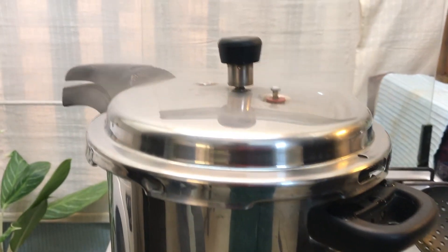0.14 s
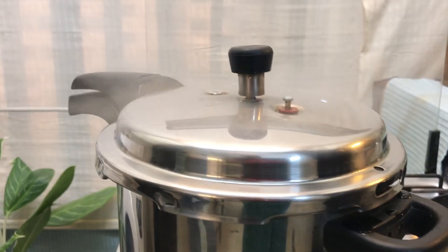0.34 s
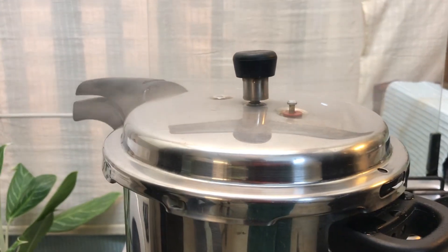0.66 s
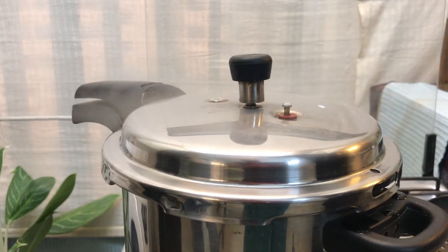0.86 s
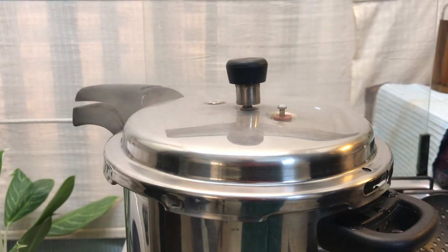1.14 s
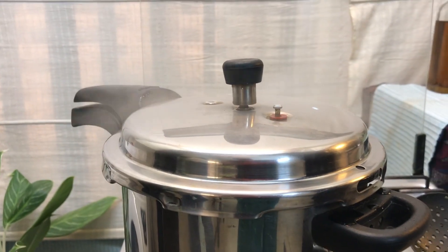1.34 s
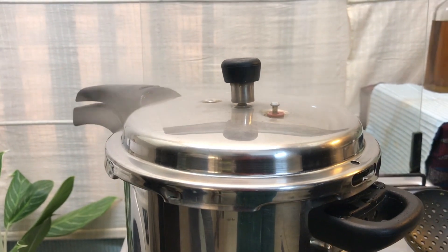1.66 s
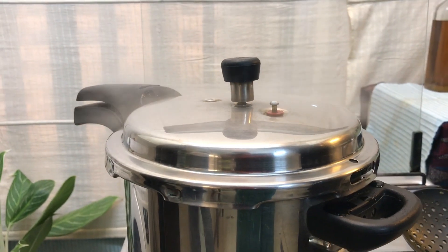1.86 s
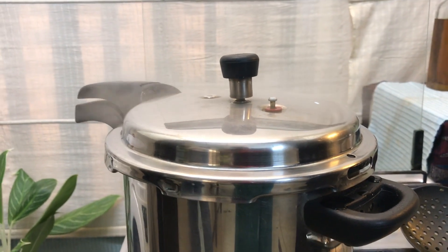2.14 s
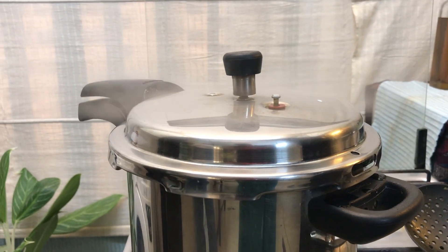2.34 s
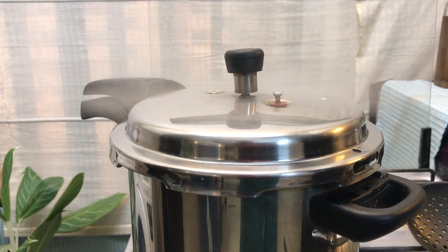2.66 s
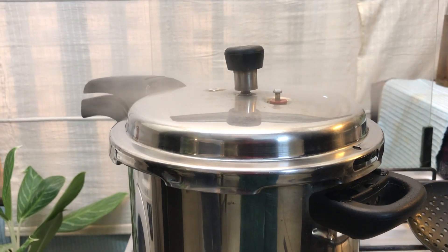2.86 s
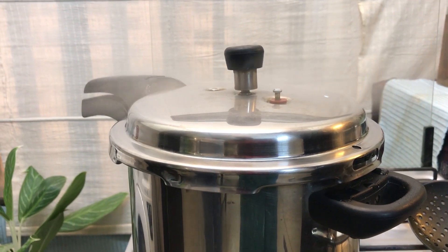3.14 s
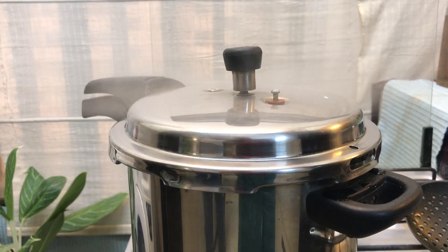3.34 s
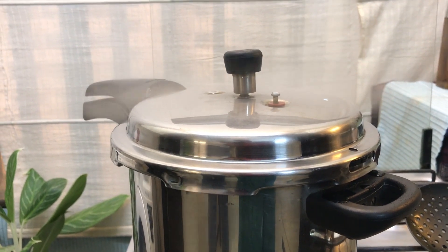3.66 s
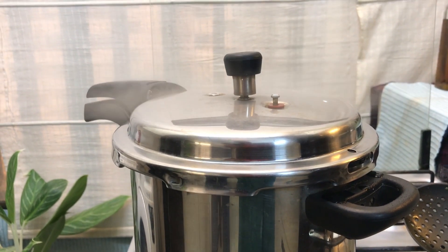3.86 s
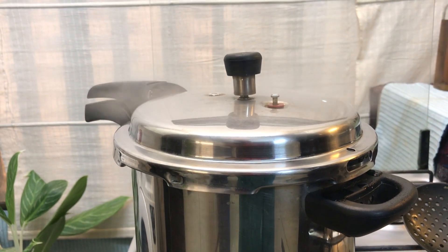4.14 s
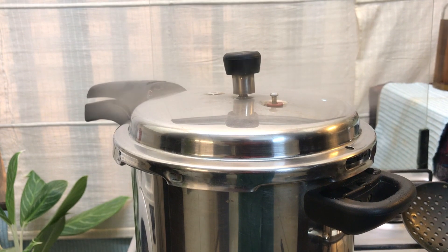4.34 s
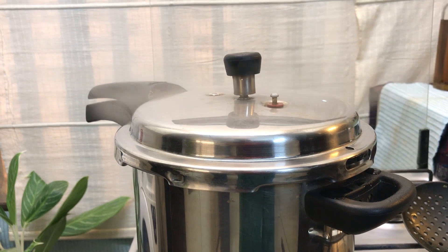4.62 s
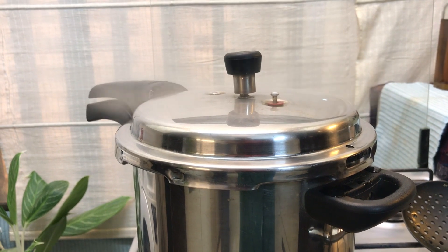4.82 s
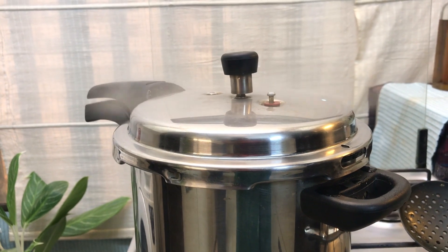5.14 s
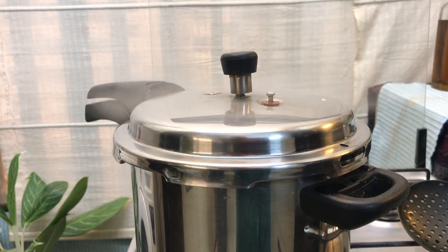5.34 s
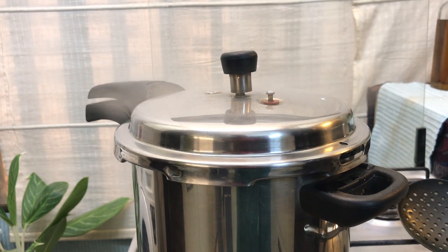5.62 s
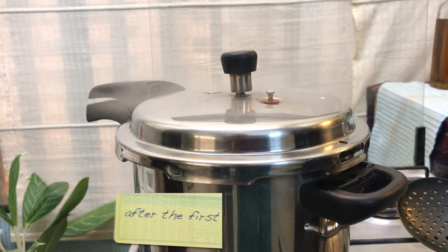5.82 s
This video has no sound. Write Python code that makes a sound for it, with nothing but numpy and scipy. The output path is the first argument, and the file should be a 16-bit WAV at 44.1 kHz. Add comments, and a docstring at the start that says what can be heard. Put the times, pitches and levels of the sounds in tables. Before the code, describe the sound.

Steam rushes continuously from under a pressure cooker's valve, a sharp, slightly wavering hiss with a faint airy whistle inside it.

```python
"""A bright, turbulent hiss: a steel pressure cooker vents on a kitchen stove, close by.
Steam rushes out under the lifted, bobbing weight valve, coloured by valve, lid and pot,
and blows a faint breathy whistle in the vent. Lid and nearby walls throw the hiss back.
Room rumble, mains hum and a few soft low tones lie far below."""
import sys
import numpy as np
from scipy import signal
from scipy.fft import rfft, irfft
from scipy.io import wavfile

SR = 44100
rng = np.random.default_rng(int(sys.argv[2]) if len(sys.argv) > 2 else 0)


def unload_audio(sound):
    """Save the sound as a 16-bit wav file, at the path given as the first command line argument."""
    columns = np.transpose(np.atleast_2d(sound))
    # keep every value between -1 and 1, then stretch to whole-number steps
    steps = np.round(np.clip(columns, -1, 1) * 32767)
    wavfile.write(sys.argv[1], SR, steps.astype(np.int16))


N = 264159
TIME = np.arange(N) / SR
FREQS_HZ = np.maximum(np.arange(N // 2 + 1) * SR / N, 1)


def from_db(db):
    """Decibels to gain."""
    return 10 ** (np.asarray(db) / 20)


def unit_rms(x):
    """Scale to rms 1."""
    return x / np.sqrt(np.mean(x ** 2) + 1e-20)


def drift(rate_hz):
    """Random wander, rms 1, rolling off above rate_hz."""
    return unit_rms(irfft(rfft(rng.standard_normal(N)) / (1 + (FREQS_HZ / rate_hz) ** 2), N))


def swell(centre_s, half_width_s):
    """Gaussian rise and fall, height 1."""
    return np.exp(-2 * ((TIME - centre_s) / half_width_s) ** 2)


def coloured_noise(spectrum):
    """Noise of rms 1, shaped by (Hz, dB) points."""
    hz, db = np.transpose(spectrum)
    gain = from_db(np.interp(np.log(FREQS_HZ), np.log(hz), db))
    return unit_rms(irfft(rfft(rng.standard_normal(N)) * gain, N))


def wavering_tone(hz, waver_hz):
    """Sine of rms 1 with wandering pitch."""
    pitch_hz = hz + waver_hz * drift(6.1)
    return np.sqrt(2) * np.sin(2 * np.pi * np.cumsum(pitch_hz) / SR)


def resonance(x, hz, width_hz):
    """Two-pole band-pass, peak gain 1."""
    return signal.lfilter(*signal.iirpeak(hz, hz / width_hz, fs=SR), x)


def below(x, hz):
    """Zero-phase low-pass with a soft edge."""
    return irfft(rfft(x) / (1 + (FREQS_HZ / hz) ** 8), N)


def dull(x, hz):
    """One-pole low-pass."""
    return signal.sosfilt(signal.butter(1, hz, fs=SR, output="sos"), x)


def mains_hum(hz=100, level_db=-60.5, waver_db=1.0):
    """Mains hum, wavering in level and pitch."""
    return from_db(level_db + waver_db * drift(4.0)) * wavering_tone(hz, waver_hz=0.42)


# Kitchen rumble spectrum. Each row: frequency in Hz, relative density in dB.
RUMBLE_SPECTRUM = [(15, -26), (30, -10), (48, 2), (80, 2), (125, 0.5), (190, 4.5), (255, -1), (350, 0.5),
                   (430, 1.5), (600, -14), (1500, -33)]


def room_rumble(level_db=-53.5):
    """Steady low noise of the kitchen."""
    return from_db(level_db) * coloured_noise(RUMBLE_SPECTRUM)


# Background tones. Each row: centre in seconds, pitch in Hz, half-width in seconds, top level in dB.
TONE_SWELLS = [(0.017, 131, 0.06, -51), (0.183, 342, 0.088, -56), (0.25, 135, 0.17, -51),
               (0.68, 133.5, 0.12, -51), (0.777, 347, 0.08, -54), (0.99, 133, 0.1, -51),
               (1.038, 348, 0.065, -56), (1.39, 351, 0.063, -51.5), (1.43, 133, 0.06, -55),
               (2.918, 187, 0.058, -53), (4.78, 189.6, 0.13, -54.5)]


def low_tones():
    """Brief soft tones that swell and fade."""
    return sum(from_db(db) * swell(centre_s, half_width_s) * wavering_tone(hz, waver_hz=3.2)
               for centre_s, hz, half_width_s, db in TONE_SWELLS)


def vent_whistle(hz=3644, width_hz=98, start_db=-37.5, rise_db_per_s=1.28, swing_db=1.4):
    """The jet blows the vent's cavity: an uneven, growing whistle that never locks to a clean tone."""
    ringing = resonance(rng.standard_normal(N), hz, width_hz)
    breathy = unit_rms(resonance(ringing, hz, 2 * width_hz))
    return breathy * from_db(start_db + rise_db_per_s * TIME + swing_db * drift(2.0))


def near_echoes(x, echo_db=-20.5, sway_s=0.00013, count=10):
    """Add echoes off lid, stove and wall; their delays slide as the hand-held microphone sways."""
    reflected = from_db(echo_db) * dull(x, hz=8340)
    slide_s = sway_s * drift(0.36)
    for delay_s, facing in zip(np.geomspace(0.002, 0.014, count), rng.uniform(-0.89, 1, count)):
        path_s = delay_s * rng.uniform(0.9, 1.1) + facing * slide_s
        x = x + np.interp(TIME - path_s, TIME, reflected, left=0)
    return x


def kitchen_reverb(x, wet_db=-11.5, t60_s=0.47, gap_s=0.008, sway_s=0.0002):
    """Add a short, duller diffuse tail; its fine colour shifts as the microphone moves."""
    t = TIME[:SR // 2]
    tail = rng.standard_normal(len(t)) * from_db(-60 * t / t60_s) * (t > gap_s)
    tail = dull(tail / np.linalg.norm(tail), hz=9000)
    wet = signal.fftconvolve(x, tail)[:N]
    swayed = np.interp(TIME + sway_s * drift(0.6), TIME, wet)
    return x + from_db(wet_db) * swayed


# Bobs of the valve weight. Each row: centre in seconds, half-width in seconds, flow change in dB.
WEIGHT_BOBS = [(0.755, 0.11, -2.0), (0.95, 0.1, 0.5), (1.25, 0.06, 0.7), (1.41, 0.07, -0.7),
               (1.88, 0.06, 0.7), (2.07, 0.11, -0.9), (3.77, 0.05, 1.0), (4.88, 0.06, -0.6),
               (5.27, 0.05, -0.6), (5.38, 0.08, 0.8)]


def steam_flow_db(surge_db=1.25, settle_s=0.74, wander_db=0.14):
    """Flow about its steady value: starts strong, settles, is throttled or freed by the bobbing weight."""
    settling_db = surge_db * np.clip(1 - TIME / settle_s, 0, 1)
    bob_db = sum(db * swell(centre_s, half_width_s) for centre_s, half_width_s, db in WEIGHT_BOBS)
    return settling_db + bob_db + wander_db * drift(4.7)


# Cooker resonances and dips. Each row: frequency in Hz, width in Hz, gain in dB.
COOKER_RESONANCES = [(608, 59, 8), (663, 74, 3.5), (1067, 69, 5), (1166, 69, 3), (1546, 190, 4.5),
                     (2010, 93, 2.5), (2820, 70, 1.5), (3150, 72, 1.5), (4070, 92, 3), (4530, 180, 4),
                     (5350, 54, 3.5), (5740, 92, 0.5), (6440, 76, -2), (12800, 500, 0), (13650, 600, -1.8)]


def cooker_body(x):
    """Valve, lid and pot lift or cut narrow bands."""
    for hz, width_hz, db in COOKER_RESONANCES:
        x = x + (from_db(db) - 1) * resonance(x, hz, width_hz)
    return x


# Steam jet spectrum. Each row: frequency in Hz, relative density in dB.
JET_SPECTRUM = [(250, -39.5), (500, -30.5), (900, -20.5), (1500, -14.5), (2300, -9), (3000, -4.5),
                (3800, -1.5), (5000, -3.5), (6300, -0.5), (7800, -5.5), (9800, -3.5), (10450, -6.5),
                (11350, -0.06), (16000, -0.97)]


def steam_jet(gain_db=-13, flutter_db=0.16, patchy_db=0.51, dulling_db_per_s=0.0757):
    """Turbulence at the valve: large eddies roar, small ones sizzle, the trembling weight shakes all."""
    flow_db = steam_flow_db()
    tilt_db = 0.42 + 0.3 * flow_db - dulling_db_per_s * TIME  # a stronger jet is brighter
    jet = cooker_body(coloured_noise(JET_SPECTRUM))
    jet = unit_rms(kitchen_reverb(near_echoes(jet)))
    roar = below(jet, hz=2660)
    sizzle = jet - below(jet, hz=9600)
    hiss = jet - roar - sizzle
    # The shifting weight tips the balance between large and small eddies.
    bands = [(roar, 0.02 - tilt_db), (hiss, 0.57), (sizzle, 3.0 + tilt_db)]
    eddies = sum(band * from_db(db + patchy_db * drift(23)) for band, db in bands)
    return eddies * from_db(gain_db + flow_db + flutter_db * drift(35))


def scene():
    """Cooker over the kitchen background, the same in both channels."""
    mono = steam_jet() + vent_whistle() + mains_hum() + room_rumble() + low_tones()
    return np.tile(mono, (2, 1))


def record(dry):
    """Steep low-pass at 15720 Hz."""
    return signal.sosfilt(signal.ellip(14, 0.1, 80, 15720, fs=SR, output="sos"), dry)


dry = scene()
out = record(dry)
unload_audio(out)
```